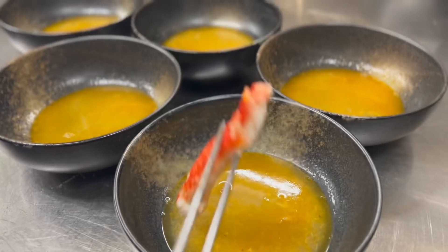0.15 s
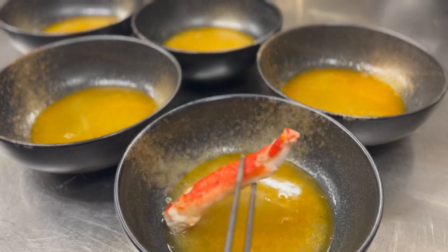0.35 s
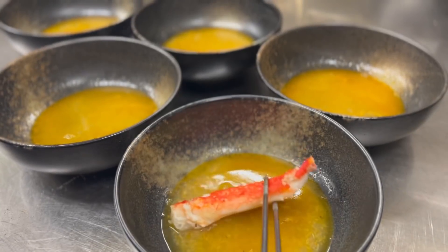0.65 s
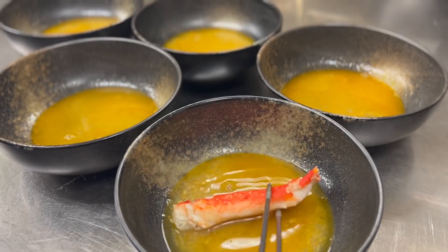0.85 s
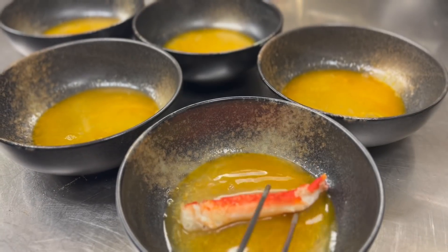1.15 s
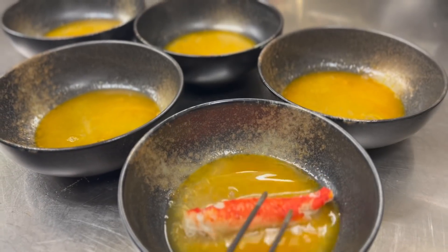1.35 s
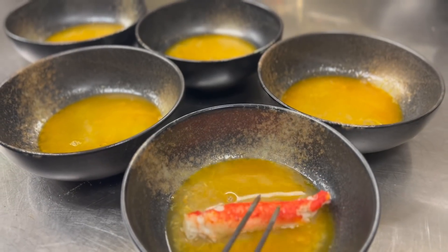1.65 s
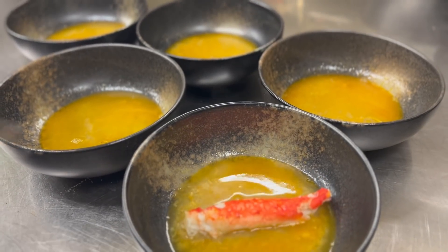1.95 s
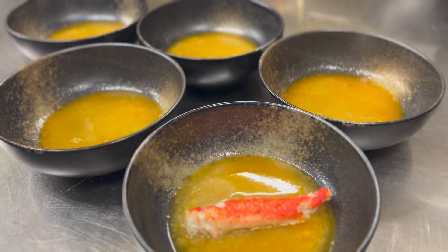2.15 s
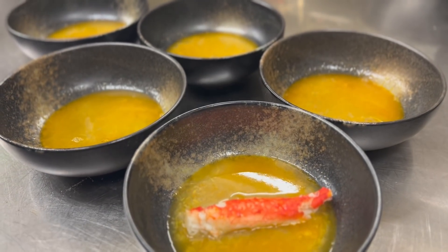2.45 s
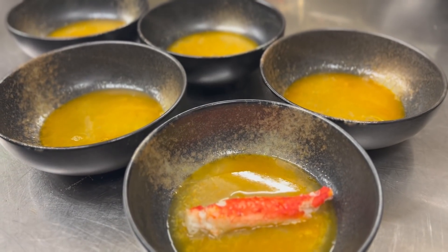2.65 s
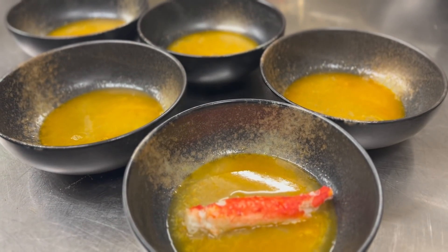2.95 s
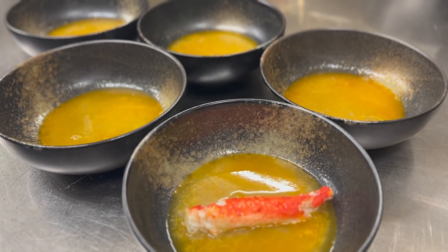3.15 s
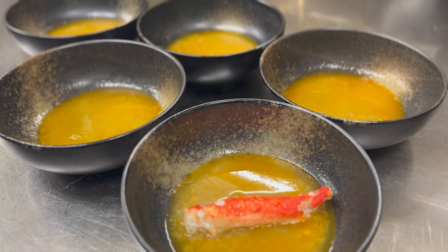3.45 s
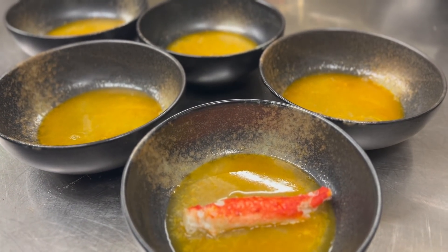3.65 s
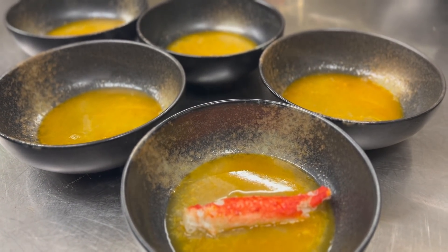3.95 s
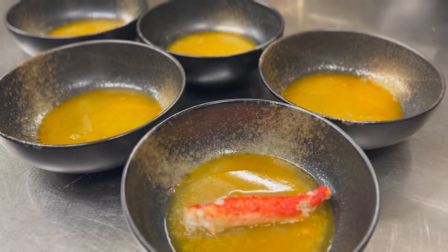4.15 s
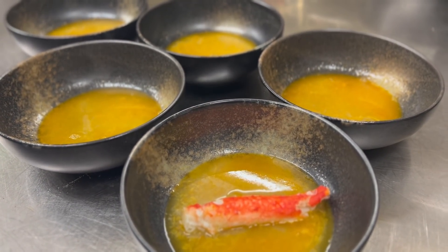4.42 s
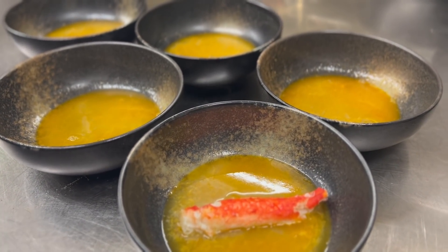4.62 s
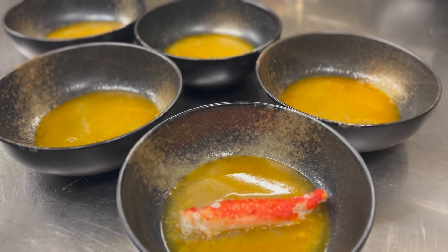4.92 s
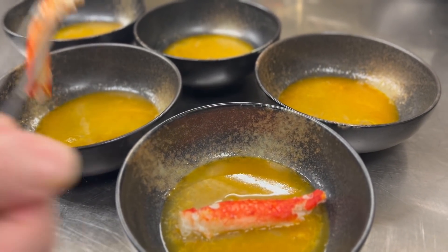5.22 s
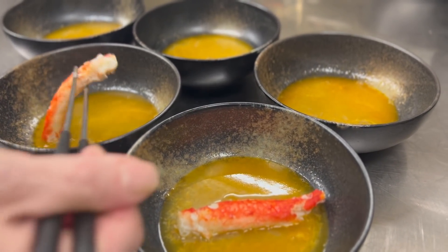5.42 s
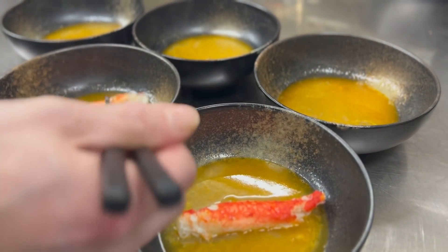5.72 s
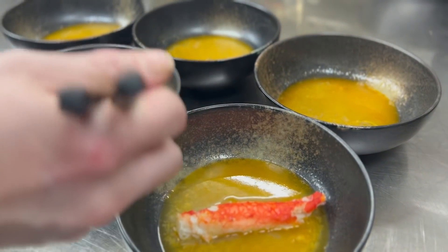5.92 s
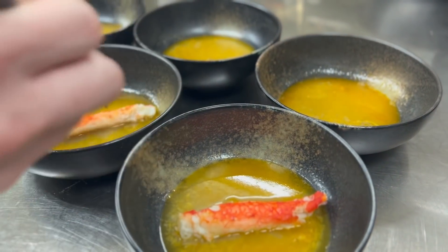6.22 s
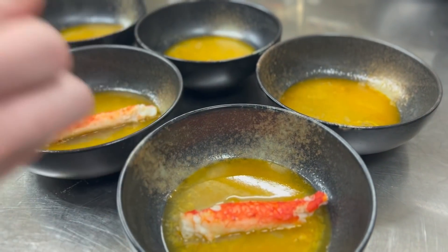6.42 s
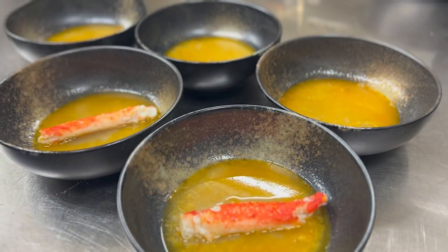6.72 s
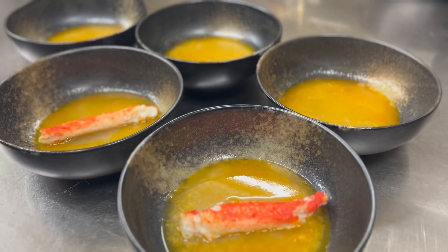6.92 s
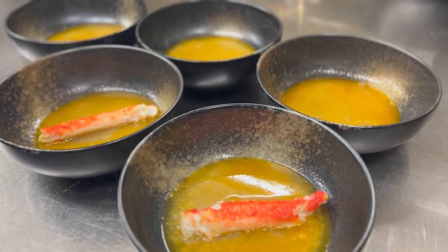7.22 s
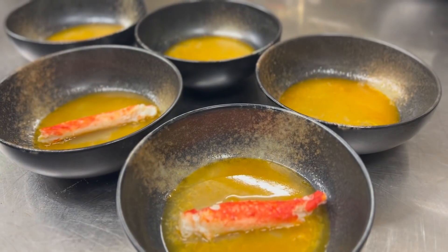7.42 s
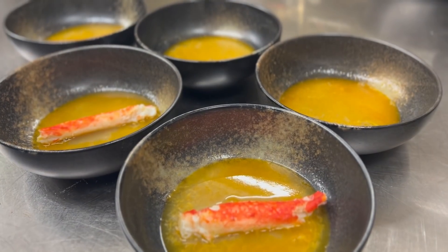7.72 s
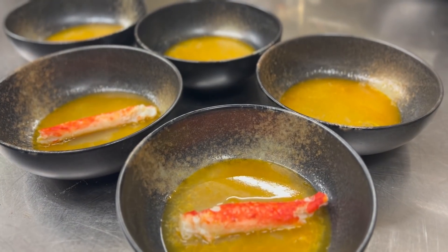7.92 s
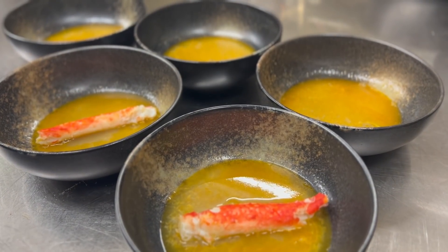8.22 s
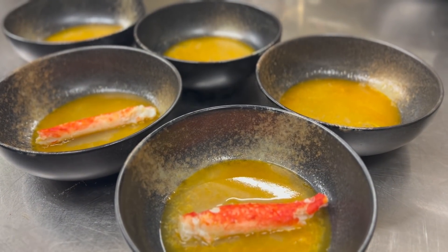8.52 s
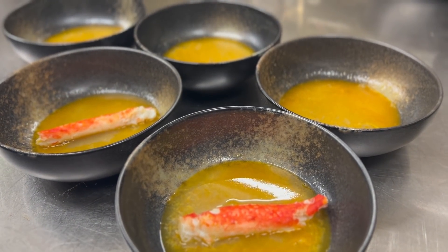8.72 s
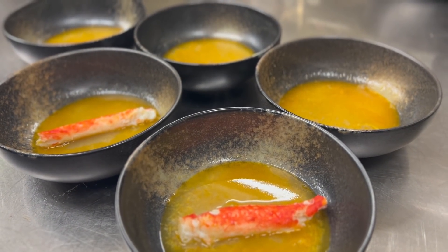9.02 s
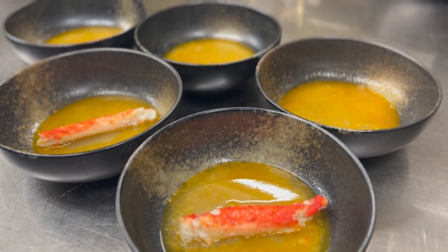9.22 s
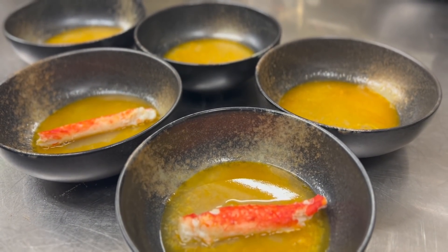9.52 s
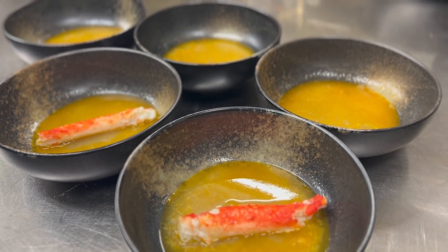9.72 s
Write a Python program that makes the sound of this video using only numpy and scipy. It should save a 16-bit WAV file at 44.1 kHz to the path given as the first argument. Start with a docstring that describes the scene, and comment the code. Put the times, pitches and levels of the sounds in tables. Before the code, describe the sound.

A stereo kitchen scene of about ten seconds, with steady extractor rumble, airy hiss that eases slightly, and wavering low motor hum. Further off, irregular chopping runs throughout: dull board thuds and brittle shell cracks, with a short hard-walled reverberation. Cuts fall near 0.1, 0.45 and 1 second, then at 2.2, 2.5 and 3, continuing every half second or so from 4; strong ones come around 7.5 and 8.9. Closer, damped steel tongs click at 1.5, sharply at 2.3, faintly at 5.8, and in a cluster at 6.9, then 7.35 and 7.55. Quick wet plops with rising pitch sound at 6.75. Pieces scrape at 2.6-3 and 3.5, with brief rubs near 5.4, 5.9 and 8. Soft counter booms come at 3.1 and 4.1, small knocks at 3.4 and 9-9.2, faint taps throughout, and a tiny rising squeak at 9.75.

```python
"""Fridges and an extractor hum in a hard-walled kitchen, and shell cracks under a blade on a steel counter.
Chopping: noise through resonances of board, blade and shell gives thuds, cracks and scrapes; the room rings.
Closer by, steel tongs lay crab legs into bowls of melted butter: damped sine modes clink, rising sines plop.
Loose pieces tap and knock, the counter booms softly, and one squeak rises late on.
The machines are shaped noise with slightly unsteady motor tones."""
import sys
import numpy as np
from scipy import signal
from scipy.fft import rfft, irfft, next_fast_len
from scipy.io import wavfile
from scipy.ndimage import uniform_filter1d, map_coordinates

SR = 44100
rng = np.random.default_rng(int(sys.argv[2]) if len(sys.argv) > 2 else 0)


def dump(signal):
    """Clip the signal to [-1, 1] and save it as 16-bit WAV at the path in sys.argv[1]."""
    limited = np.clip(np.atleast_2d(signal).T, -1, 1)
    pcm = np.round(limited * 32767).astype(np.int16)
    wavfile.write(sys.argv[1], SR, pcm)


N = 435266
SIZE = 24576  # samples in one short event
T, HZ = np.arange(SIZE) / SR, np.fft.rfftfreq(SIZE, 1 / SR)
TOP_HZ = 15900  # upper limit of the whole sound

# All levels in the tables are relative; each source applies its own gain.
# chops: start_s, crack_level_db, thud_level_db, cutting_time_s, piece_pitch_hz, piece_lift_db
CHOPS = [(0.093, -30, -17.5, .002, 3650, 1), (0.438, -50, -13, 0.0029, 2770, 5),
         (0.467, -20, -11, .001, 3930, 6), (0.956, -22.5, -13, 0.0046, 3640, 8),
         (2.191, -26, -22, 0.0039, 4070, 11), (2.498, -11, -16, .016, 4230, 13.5),
         (2.972, -17, -9, 0.017, 3500, 1), (4.064, -10.5, -14, .008, 3870, 6),
         (4.674, -16, -8, 0.016, 4000, 6), (5.027, -13.5, -14.5, 0.03, 3760, 3),
         (5.525, -22, -15.5, 0.00091, 4600, 6), (6.063, -14.5, -7, 0.018, 3570, 5),
         (6.424, -18, -17, .001, 4420, 4), (6.966, -21.5, -17.5, .002, 6500, 6),
         (7.439, -19, -21, 0.0078, 4070, 12), (7.479, -16.5, -5.5, .024, 4750, 15),
         (7.835, -24, -19, 0.0021, 6400, 9), (8.353, -20.5, -17, 0.0036, 6300, 10),
         (8.884, -7, -6.5, .016, 3750, 7), (9.398, -23.5, -16, 0.00099, 2770, 16),
         (9.785, -17, -20, .01, 4860, 12)]
# cracks of shell without a thud of their own, some snapping clear, some leading into a chop: start_s, level_db,
# piece_pitch_hz
SNAPS = [(0.022, -23, 3770), (1.076, -23, 2240), (1.428, -26, 3750), (1.7754, -26, 4580),
         (3.036, -19.5, 4570), (3.081, -22, 3630), (3.245, -22.5, 6450), (4.638, -16.5, 4860),
         (7.568, -25.5, 4900), (8.093, -20.5, 3870), (8.326, -27, 4730), (8.416, -21, 4540),
         (8.86, -15, 4470), (9.437, -24, 4060)]
# cut pieces tumbling over the board: start_s, level_db
KNOCKS = [(3.385, -28), (8.988, -21.5), (9.048, -24.5), (9.108, -22), (9.224, -31)]
# pieces pushed over the board: start_s, end_s, level_db, pressure_db, swell_over_stroke_db
SCRAPES = [(2.57, 3.04, -29, 8.5, 14.5), (3.458, 3.723, -35.5, -4, -12), (5.372, 5.485, -35, -21, -10),
           (5.914, 6.03, -33.5, -14, 3), (7.994, 8.12, -33, -15, 0)]
# dull bumps on the counter: start_s, pitch_hz, level_db
BUMPS = [(3.067, 243.5, -21.5), (4.099, 114, -20)]
# the tongs touching: start_s, touch_level_db, arm_ring_level_db (against the touch)
CLINKS = [(1.536, -11.5, -22), (2.324, -4, -15.5), (5.790, -27.5, 4), (6.893, -4, -8), (6.926, -11, -14),
          (6.941, -10.5, -9), (7.349, -12.5, -21), (7.566, -13, -3.5)]
# a leg settling in the butter: start_s, starting_pitch_hz, level_db
PLOPS = [(6.7564, 970, -9.5), (6.782, 1020, -10.5), (6.7857, 1210, -15)]
# resonances of the board: pitch_hz, width_hz, lift_db
BOARD_MODES = [(296, 50, 4), (587, 26, 5), (847, 40, 7), (1080, 220, 3)]
# resonances of the dragged edge, before grip and glide: pitch_hz, width_hz, lift_db
EDGE_MODES = [(1390, 100, 8), (2130, 130, 11), (2790, 70, 10), (3090, 120, 11), (4000, 130, 13),
              (5150, 110, 6), (5680, 70, 9)]
# resonances of the blade: pitch_hz
BLADE_MODES = [1845, 2050, 2770, 3666, 3800, 3968, 4258, 4392, 5245]
# modes of the tongs' arms: pitch_hz
TONGS_MODES = [3480, 3620, 4262, 4910, 5390, 5750, 7750, 8480, 12130, 14950]
# broad spectra of board, shell, rubbing and touching tips: frequency_hz, density_db (per Hz)
WOOD_SPECTRUM = [(25, -17), (50, -18), (120, 4), (300, 4.5), (750, 1.5), (1100, -4.5), (1600, -15),
                 (2300, -23.5), (3500, -24.5), (8000, -56)]
SHELL_SPECTRUM = [(600, -9.5), (1080, 3.5), (1700, -6), (3300, -8), (3750, 3), (4700, -0.5), (6400, 1),
                  (7200, -6.5), (10000, -9.5), (16000, -4.5)]
GRIT_SPECTRUM = [(400, -7), (1000, 5), (2000, -3), (5500, -4.5), (7500, -11.5), (15000, -37)]
TICK_SPECTRUM = [(800, -50), (2500, -1), (5500, 9.5), (9500, 0), (14500, 5), (16000, -6)]
# broad spectra of the extractor's rumble and hiss: frequency_hz, density_db (per Hz)
FAN_SPECTRUM = [(28, -42), (46, -3), (56, -10), (70, 3.5), (95, -5), (120, -0.5), (160, -6), (290, -5),
                (450, -11.5), (1000, -13.5), (1700, -18), (8000, -57.5)]
HISS_SPECTRUM = [(900, -26), (1900, 8), (5000, 6), (6400, 5.5), (7200, 1), (10000, -5), (16000, -3.5)]
# course of the extractor's hiss: time_s, level_db
HISS_COURSE = [(0, -45.5), (3.6, -49), (9.87, -50)]
# motor lines: pitch_hz, level_db
MOTOR_LINES = [(70, -45.5), (285.3, -46), (578, -55)]
# reverberation time of the room: frequency_hz, t60_s
ROOM_T60 = [(300, 0.52), (1000, 0.35), (6000, 0.48), (15000, 0.19)]
# likeness of the two channels in a diffuse field: frequency_hz, coherence (0-1)
COHERENCE = [(80, .99), (180, .88), (450, .62), (850, .66), (1300, .35), (2000, .38), (4000, .2),
             (8000, .35), (9800, .92)]
# phase by which the left channel leads: frequency_hz, lead_rad
LEFT_LEAD = [(150, 0), (550, 1.1), (1900, 3.1), (2900, 6.3), (5500, 8), (7500, 6.2), (10200, 3.14),
             (13300, 0), (16000, -3.1)]
# level of left over right: frequency_hz, difference_db
LEFT_TILT = [(800, 0), (2300, -2.5), (4400, 1), (4900, 7), (7300, -0.5)]

# first jolt of the board against the thud; the lower wall's crack against the upper's
ENTRY_DB, UNDERSIDE_DB = -5, -7
LAND_S = 0.002  # build-up scale of a thud, to which a landing adds a quarter of the cutting time
# bass shelf when thud and crack are level; dB more for each dB that the thud exceeds the crack
BASS_DB, BASS_GROWS = -12.5, 0.19
# treble shelf of a 0 dB crack; dB more for each dB that a crack is lighter
SPLINTER_DB, SPLINTER_FALLS = -19.5, 0.63
BLADE_LIFT_DB, BLADE_WIDTH_HZ = 11, 32  # greatest lift and width of a blade mode
PIECE_WIDTH_HZ, SNAP_RING_DB = 230, 8  # main resonance of a piece: width, lift in a crack without a thud
RUB_RATE, RUB_DB = 28.7, -3.5  # uneven rubbing: random knots a second, depth
EASE_DB, DRAG_SAG_PER_S = 4, 0.07  # along a stroke: loss of pressure, share by which resonances sink a second
DRAG_WANDER, DRAG_WANDER_RATE = 0.007, 11  # the edge rocks: share of wander in pitch, knots a second
SQUEAK_S, SQUEAK_LENGTH_S, SQUEAK_DB = 9.73, 0.15, -29
SQUEAK_HZ, SQUEAK_RISE_HZ_PER_S = 665, 1900
TONGS_T60 = 0.09  # s, ring time of the lowest mode; higher ones die sooner
# slope of the arm modes; the lighter the touch, the duller: dB per octave for each dB
TONGS_DB_PER_OCTAVE, TONGS_SOFT = -5, 0.21
REBOUND_S, REBOUND_DB = 0.004, 0  # the tips meet again after each touch


def contacts():
    """Two-stage fracture: the upper wall breaks, then the lower as the blade lands.

    Rows: start_s, crack_level_db, thud_level_db, build_up_s, piece_pitch_hz, piece_lift_db."""
    rows = []
    for s, crack_db, thud_db, cut_s, hz, ring_db in CHOPS:
        rows.append((s, crack_db, thud_db + ENTRY_DB, LAND_S, hz, ring_db))
        rows.append((s + cut_s, crack_db + UNDERSIDE_DB, thud_db, LAND_S + cut_s / 4, hz, ring_db))
    return rows


def thuds(level_db=-6, direct_db=-4, direct_t60=0.059):
    """Impact excitation: a blow rings board and counter, with more bass the less the shell resists."""
    out = np.zeros((2, N))
    for s, crack_db, db, build_s, *_ in contacts():
        build_up = 1 - np.exp(-2 * T / build_s)
        direct = amp(direct_db - 60 * T / direct_t60) * build_up * diffuse()
        spot = chance_modes(300, 2000, lift_db=8, count=9)
        bass_db = BASS_DB + BASS_GROWS * (db - crack_db)
        blow = echoes(swell=build_s) + direct
        body = colour(blow, WOOD_SPECTRUM, BOARD_MODES + spot, bass_db * below(690))
        add(out, s, amp(db + level_db) * body)
    return out


def cracks(level_db=-8, direct_db=-3, direct_t60=0.18):
    """Brittle fracture: splintering bursts excite the blade and each piece's own resonances."""
    out = np.zeros((2, N))
    breaks = [(s, db, hz, ring_db) for s, db, _, _, hz, ring_db in contacts()]
    snaps = [(*snap, SNAP_RING_DB) for snap in SNAPS]
    for s, db, ring_hz, ring_db in breaks + snaps:
        decay = amp(direct_db - 60 * T / direct_t60)
        crunch = decay * (1 - np.exp(-T / 0.0002)) * grains(spread_db=2)
        # the point of contact decides how strongly each blade mode answers
        blade = [(hz, BLADE_WIDTH_HZ, BLADE_LIFT_DB * rng.random()) for hz in BLADE_MODES]
        piece = chance_modes(2500, 8000, lift_db=10, count=14)
        modes = blade + piece + [(ring_hz, PIECE_WIDTH_HZ, ring_db)]
        treble_db = (SPLINTER_DB - SPLINTER_FALLS * db) * (1 - below(3060))
        body = colour(echoes(swell=0.0038) + crunch, SHELL_SPECTRUM, modes, treble_db)
        add(out, s, amp(db + level_db) * body)
    return out


def scrapes():
    """Sliding friction: rough rubbing excites the edge; pressure lifts the lows and eases along the stroke."""
    out = np.zeros((2, N))
    for start, end, db, pressure_db, swell_db in SCRAPES:
        travel = np.clip(T / (end - start), 0, 1)
        stroke = np.sqrt(np.abs(np.sin(np.pi * travel))) * amp(swell_db * (travel - .5))
        rubbing = grains(spread_db=3) * amp(RUB_DB * wobble(RUB_RATE, size=SIZE))
        slips = stroke * patchy(rubbing, depth_db=2)
        grip = amp(pressure_db / 10)  # the firmer the stroke, the more the edge rings
        edge = [(hz, width, grip * lift) for hz, width, lift in EDGE_MODES]
        modes = edge + chance_modes(1500, 6500, lift_db=4, count=10)
        # crossfade from firm to eased pressure
        pressed = colour(slips * (1 - travel), GRIT_SPECTRUM, modes, pressure_db * below(2300))
        eased = colour(slips * travel, GRIT_SPECTRUM, modes, (pressure_db - EASE_DB) * below(2400))
        # a varying reading speed moves all the resonances together
        speed = 1 - DRAG_SAG_PER_S * T + DRAG_WANDER * wobble(DRAG_WANDER_RATE, size=SIZE)
        gliding = [map_coordinates(side, [np.cumsum(speed)]) for side in pressed + eased]
        add(out, start, amp(db) * np.array(gliding))
    return out


def tumble(body_db=17):
    """Hollow-body resonance: a loose piece knocks on the board and its low modes answer."""
    out = np.zeros((2, N))
    for s, db in KNOCKS:
        piece = chance_modes(700, 2000, lift_db=9, count=5)
        knock = colour(echoes(swell=0.0013), GRIT_SPECTRUM, piece, body_db * below(2400))
        add(out, s, amp(db) * knock)
    return out


def squeak():
    """Fast stick and slip, as of a wet blade: one rough, rising tone swells and fades."""
    sweep_hz = SQUEAK_HZ + SQUEAK_RISE_HZ_PER_S * T
    phase = 2 * np.pi * np.cumsum(sweep_hz) / SR + wobble(220, size=SIZE)
    swell = np.sin(np.pi * np.clip(T / SQUEAK_LENGTH_S, 0, 1)) ** 2
    out = np.zeros((2, N))
    add(out, SQUEAK_S, nearby(amp(SQUEAK_DB) * swell * np.sin(phase), wet_db=-5))
    return out


def clinks(tick_db=-7, tick_t60=0.021, ring_db=-12, attack_s=0.0032):
    """Damped modal vibration: the tips touch and rebound once, and the steel arms ring, damped by the hand."""
    out = np.zeros((2, N))
    hz = np.array(TONGS_MODES)[:, None]
    rebounds = [(s + REBOUND_S, db + REBOUND_DB, arms_db) for s, db, arms_db in CLINKS]
    for s, db, arms_db in CLINKS + rebounds:
        tick = colour(amp(tick_db - 60 * T / tick_t60) * grains(spread_db=3), TICK_SPECTRUM)
        mode_db = (TONGS_DB_PER_OCTAVE + TONGS_SOFT * db) * np.log2(hz / hz[0])
        decay_db = 60 * T * np.sqrt(hz / hz[0]) / TONGS_T60
        modes = amp(mode_db - decay_db) * np.sin(2 * np.pi * (hz * T + rng.random(hz.shape)))
        # each channel hears the modes in its own balance
        ring = amp(2 * rng.standard_normal((2, len(TONGS_MODES)))) @ modes
        touch = (tick + amp(ring_db + arms_db) * ring) * (1 - np.exp(-T / attack_s))
        add(out, s, amp(db) * nearby(touch, wet_db=-8))
    return out


def plops(rise=3, t60=0.026, smack_db=-13, smack_t60=0.21):
    """Cavity resonance: air pockets close in thick butter, a few rising cycles each, with a wet smack."""
    out = np.zeros((2, N))
    for s, hz, db in PLOPS:
        tone = np.sin(2 * np.pi * hz * T * (1 + rise * T))
        pocket = tone * amp(-60 * T / t60) * (1 - np.exp(-T / 0.00037))
        burst = amp(smack_db - 60 * T / smack_t60) * diffuse()
        smack = colour(burst, GRIT_SPECTRUM, shelf_db=12.5 * below(2000))
        add(out, s, amp(db - 1.5) * nearby(pocket + smack, wet_db=-13.0))
    return out


def bumps(t60=0.22):
    """Single-mode excitation: a soft push sets one low mode of the counter booming."""
    out = np.zeros((2, N))
    for s, hz, db in BUMPS:
        boom = amp(db - 60 * T / t60) * np.sin(2 * np.pi * hz * T)
        add(out, s, nearby(boom, wet_db=-6.0))
    return out


def handling(level_db=-41, count=34):
    """Reverberant field alone: nudged bits of shell tap faintly throughout, with no direct sound."""
    out = np.zeros((2, N))
    offsets, sizes_db = rng.random(count), rng.normal(0, 4.5, count)
    for k, (offset, size_db) in enumerate(zip(offsets, sizes_db)):
        piece = chance_modes(1000, 7000, lift_db=14, count=10)
        s = (k + offset) / count * (N - 1) / SR  # one tap in each equal slot of time
        tap = colour(echoes(swell=0.0033), GRIT_SPECTRUM, piece)
        add(out, s, amp(level_db + size_db) * tap)
    return out


def machines(fan_db=-32.5, hiss_db=8):
    """Broadband flow noise and tonal lines: the extractor rumbles and hisses over unsteady motor tones."""
    t, size = np.arange(N) / SR, next_fast_len(N)
    rumble = amp(fan_db + .7 * wobble(5)) * diffuse(size, FAN_SPECTRUM)[:, :N]
    air = patchy(diffuse(size, HISS_SPECTRUM)[:, :N], depth_db=2)
    course_db = np.interp(t, *np.transpose(HISS_COURSE))
    hiss = amp(course_db + hiss_db + wobble(1.33) / 2 + wobble(6.8) / 2) * air
    hum = 0
    for hz, db in MOTOR_LINES:
        lead = along(LEFT_LEAD, hz) * np.array([[.5], [-.5]])
        phase = 2 * np.pi * hz * t + wobble(9.1) + lead
        hum = hum + np.sqrt(2) * amp(db + 3.0 * wobble(5.2)) * np.sin(phase)
    return rumble + hiss + hum


def nearby(x, wet_db):
    """Direct and reverberant sound: a close source with the room's answer."""
    tail = echoes(swell=0.003)
    answer = signal.fftconvolve(np.atleast_2d(x), tail / np.linalg.norm(tail[0]), axes=1)[:, :SIZE]
    return x + amp(wet_db) * answer


def echoes(swell):
    """Reverberation: reflections build up in uneven clusters, then each frequency dies at its own speed."""
    hz, t, z = signal.stft(diffuse(), SR, nperseg=256)
    decay = amp(-60 * t / along(ROOM_T60, hz)[:, None])
    tail = signal.istft(z * decay, SR, nperseg=256)[1][:, :SIZE]
    clusters = unit(amp(1.8 * wobble(170, size=SIZE)))
    return tail * clusters * (1 - np.exp(-T / max(swell, 1e-4)))


def diffuse(size=SIZE, spectrum=((100, 0),)):
    """Diffuse field: noise from all around, two channels with set coherence, phase and tilt, rms 1."""
    hz = np.fft.rfftfreq(size, 1 / SR)
    a, b = rfft(rng.standard_normal((2, size)))
    turn = np.arccos(np.clip(along(COHERENCE, hz), 0, 1 - 1e-2)) / 2
    skew = amp(along(LEFT_TILT, hz) / 2) * np.exp(1j * along(LEFT_LEAD, hz) / 2)
    mid, side = a * np.cos(turn), b * np.sin(turn)
    pair = np.array([(mid + side) * skew, (mid - side) / skew])
    return unit(irfft(pair * amp(along(spectrum, hz)), size))


def colour(x, spectrum, modes=(), shelf_db=0):
    """Minimum-phase filtering: a causal body of unit power, a broad spectrum with resonances on it."""
    resonances = sum(lift / (1 + ((HZ - hz) / width * 2) ** 2) for hz, width, lift in modes)
    db = along(spectrum, HZ) + shelf_db + resonances
    # folding the cepstrum onto positive time makes the response causal
    cepstrum = irfft(np.log(unit(amp(db))))[:SIZE // 2]
    cepstrum[1:] *= 2
    return irfft(rfft(x) * np.exp(rfft(cepstrum, SIZE)))


def chance_modes(low_hz, high_hz, lift_db, count):
    """Modal scatter: resonances of an arbitrary piece, new each time, as pitch_hz, width_hz, lift_db."""
    hz = low_hz * (high_hz / low_hz) ** ((np.arange(count) + rng.random(count)) / count)
    shares = rng.uniform(-.5, 1, count)  # negative ones are dips
    return [(f, f / 40 + 20, lift_db * share) for f, share in zip(hz, shares)]


def grains(spread_db):
    """Granular excitation: half-millisecond bursts of uneven size, as when shell splinters."""
    sizes = uniform_filter1d(rng.standard_normal(SIZE), size=22)
    return unit(diffuse() * amp(spread_db * unit(sizes)))


def patchy(x, depth_db):
    """Spectral fluctuation: narrow bands come and go every few hundredths of a second."""
    z = signal.stft(x, nperseg=1024)[2]
    field = uniform_filter1d(rng.standard_normal(z.shape[1:]), size=3, axis=0)  # over frequency
    field = uniform_filter1d(field, size=6, axis=1)  # over time
    return unit(signal.istft(z * amp(depth_db * unit(field)), nperseg=1024)[1][:, :x.shape[1]])


def wobble(rate, size=N):
    """Slow random modulation: a smooth curve with rate knots a second."""
    knots = rng.standard_normal(int(size * rate / SR) + 4)
    return map_coordinates(knots, [np.arange(size) * rate / SR])


def below(corner_hz):
    """Low-pass weighting: near 1 under the corner, falling to 0 above it."""
    return 1 / (1 + (HZ / corner_hz) ** 4)


def along(points, hz):
    """Interpolation of frequency-value points on a logarithmic frequency axis."""
    f, v = np.transpose(points)
    return np.interp(np.log(hz + 1), np.log(f), v)


def amp(db):
    """Decibels to amplitude ratio."""
    return 10 ** (np.asarray(db) / 20)


def unit(x):
    """Normalisation to rms 1."""
    return x / np.sqrt(np.mean(x ** 2) + 1e-20)


def add(track, s, x):
    """Superposition: mix x into the track from time s."""
    i = round(s * SR)
    track[:, i:i + x.shape[1]] += x[:, :N - i]


def scene():
    """Superposition of sources: chopping further off, tongs and butter close by, machines all around."""
    chopping = thuds() + cracks() + scrapes() + tumble() + squeak() + bumps() + handling()
    return chopping + clinks() + plops() + machines()


def record(dry):
    """Band limitation: everything from TOP_HZ upwards is removed."""
    size = next_fast_len(N + SIZE)
    passband = np.fft.rfftfreq(size, 1 / SR) < TOP_HZ
    return irfft(rfft(dry, size) * passband, size)[:, :N]


dry = scene()
out = record(dry)
dump(out)
```